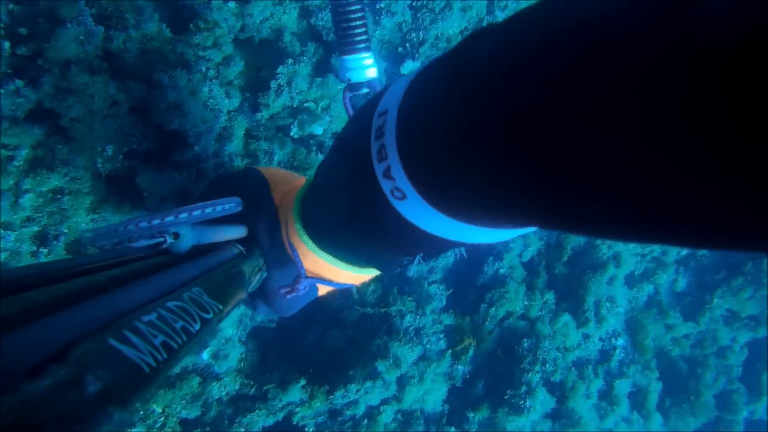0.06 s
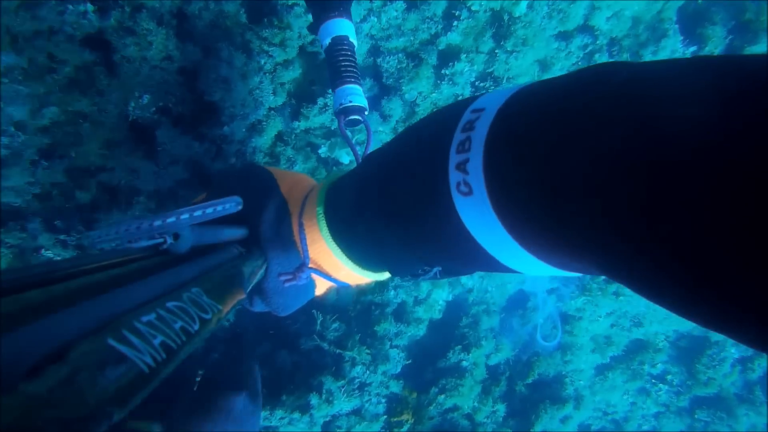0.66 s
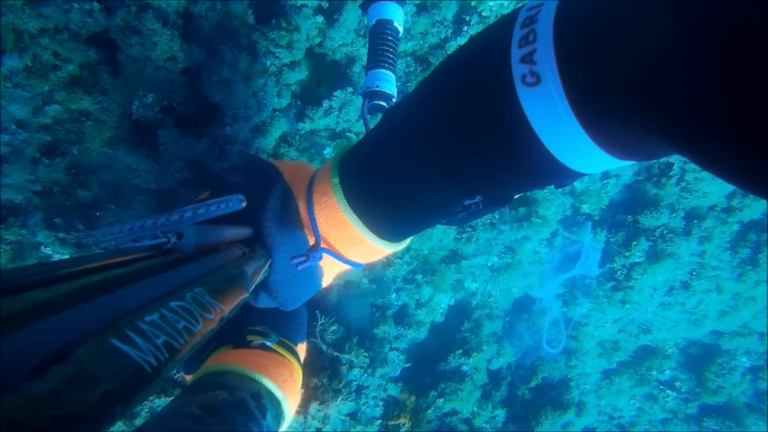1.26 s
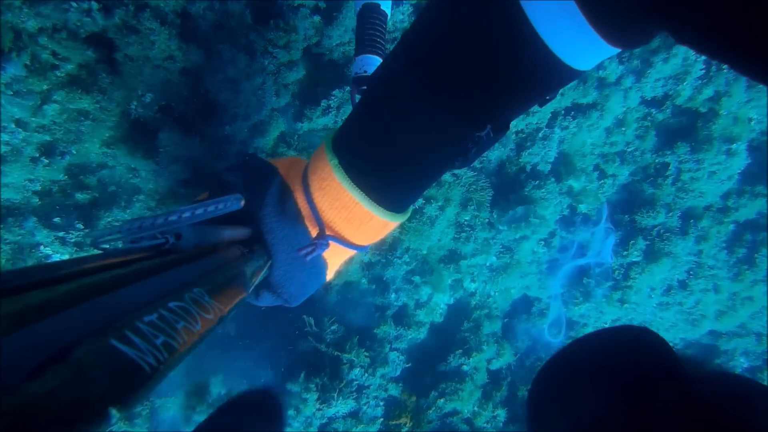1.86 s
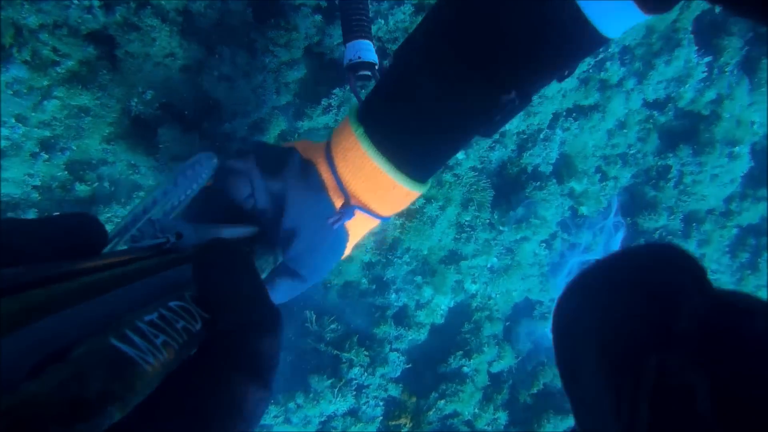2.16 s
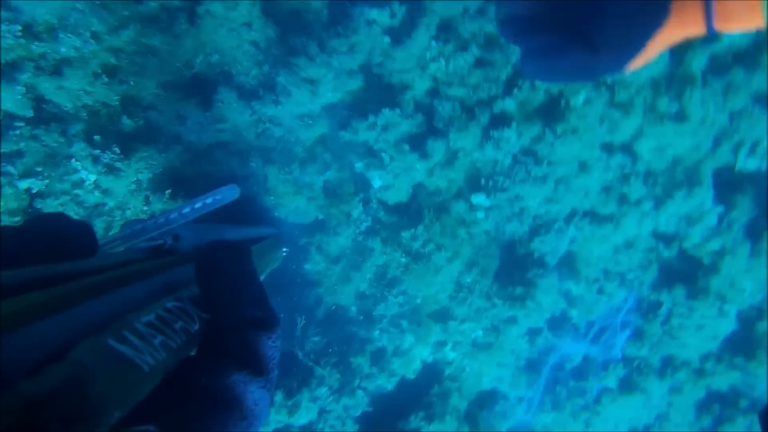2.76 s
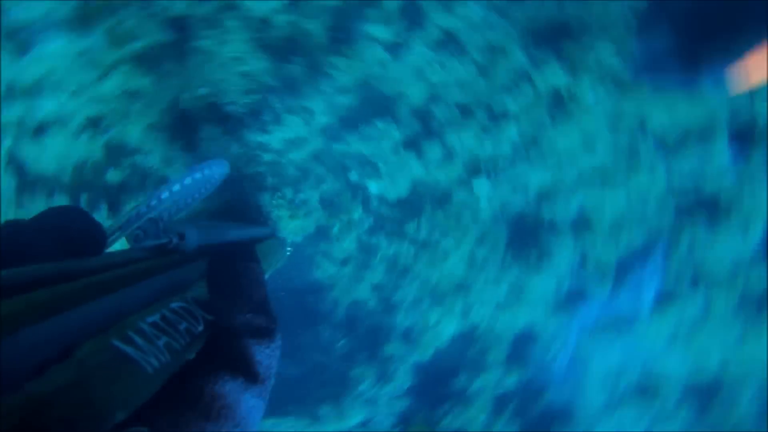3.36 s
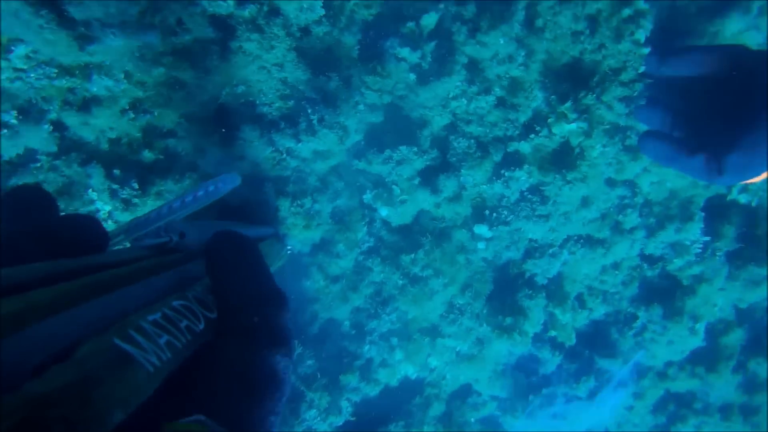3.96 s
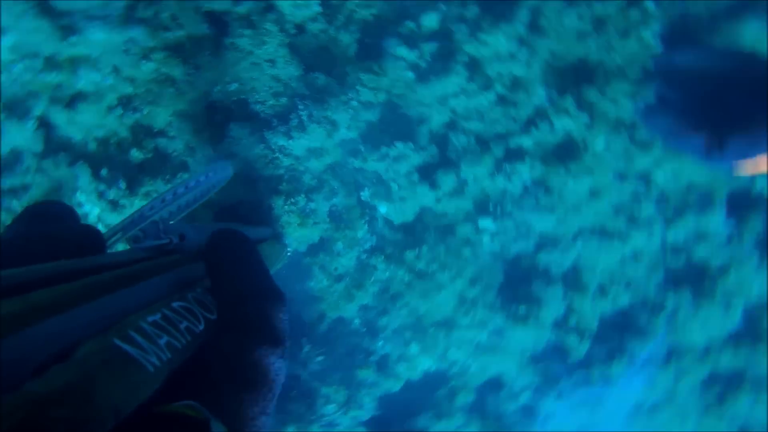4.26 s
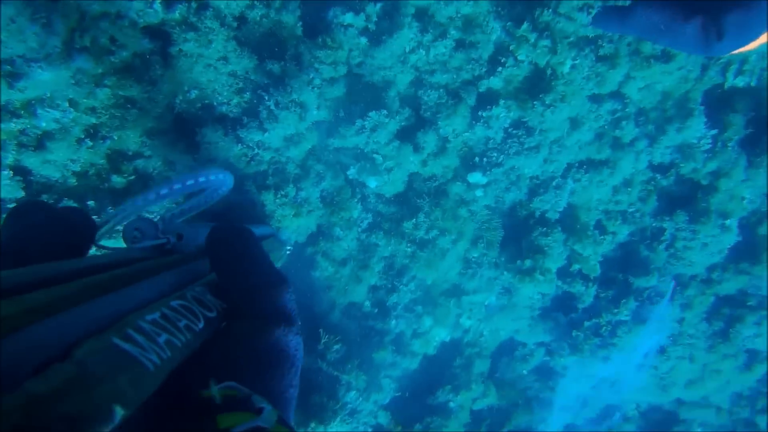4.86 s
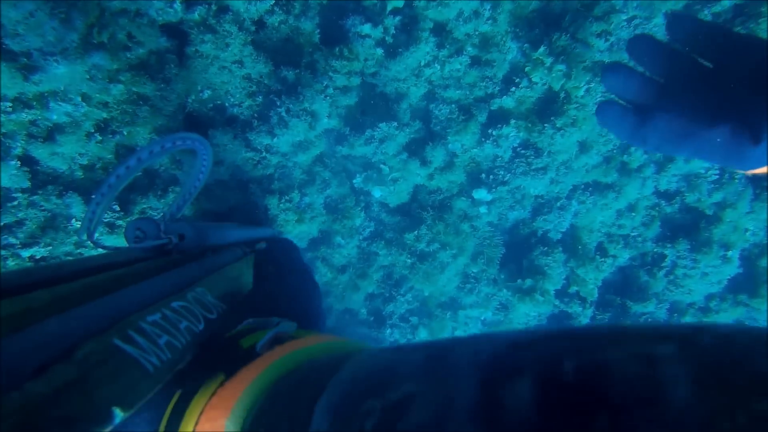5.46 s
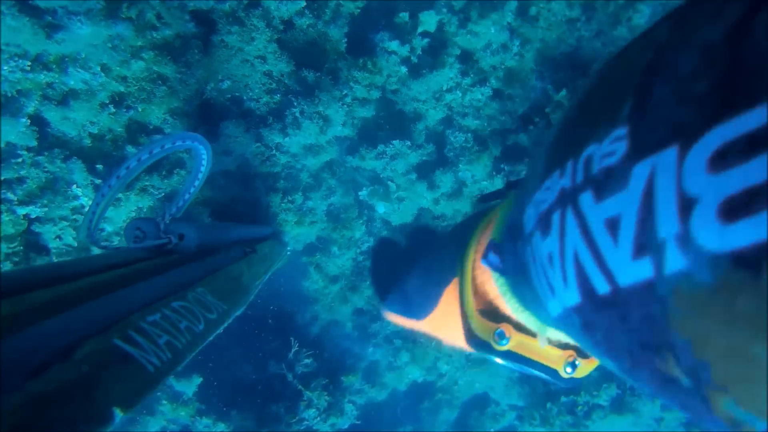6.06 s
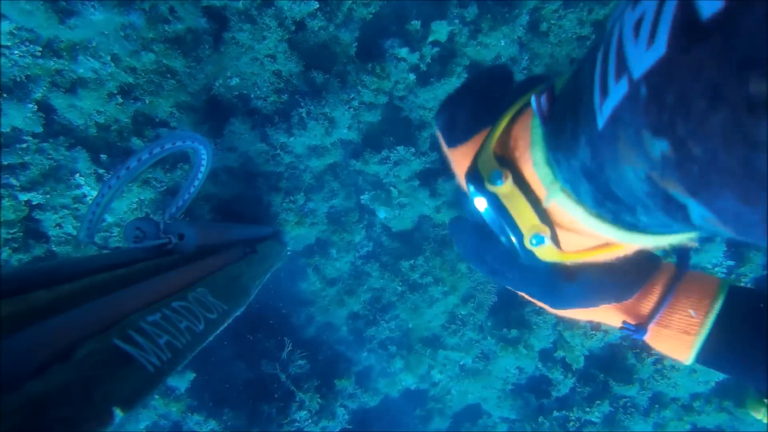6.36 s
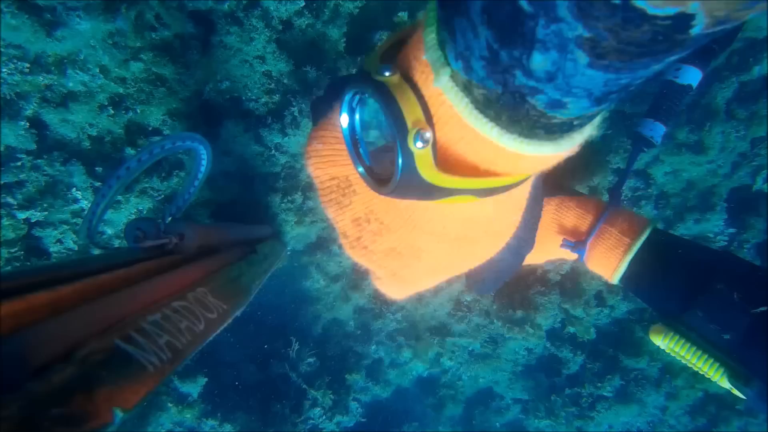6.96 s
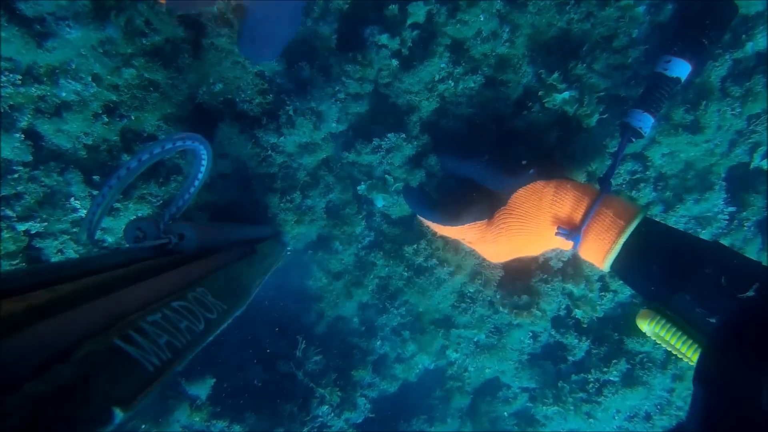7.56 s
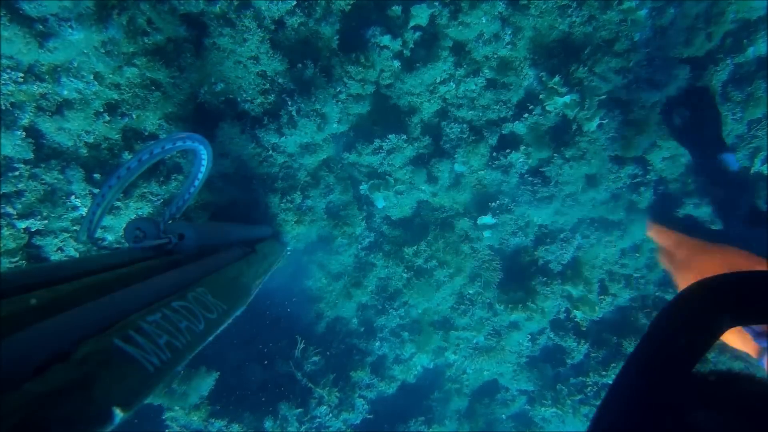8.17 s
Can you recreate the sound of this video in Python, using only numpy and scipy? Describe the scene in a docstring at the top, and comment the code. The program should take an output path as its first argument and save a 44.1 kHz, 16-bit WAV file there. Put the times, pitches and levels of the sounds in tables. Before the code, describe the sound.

A diver crawls over a rocky bottom with a speargun, heard from inside a sealed camera housing. A few hard knocks and a rubber groan give way to a long, growling judder. Then comes a busy stretch of gritty rubbing, scraping, pops and loud knocks, some overloading the microphone, with water rumbling low beneath. The gun comes to rest, leaving soft nudges and sharp little ticks of grit.

```python
"""Underwater on a rocky bottom, heard from inside a camera's sealed housing: a diver crawls with a speargun.
Rubber and neoprene stick and slip on the gun, once in a long judder, shaking the camera's mount and the
housing's wall and shell. Gear knocks on the gun and overloads the microphone. Water sways round the case,
and grit crackles in sharp ticks that go on when the gun comes to rest."""
import sys
import numpy as np
from scipy import signal
from scipy.fft import rfft, irfft
from scipy.io import wavfile
from scipy.ndimage import uniform_filter1d

SR = 44100
rng = np.random.default_rng(int(sys.argv[2]) if len(sys.argv) > 2 else 0)


def store_pcm(level_fs):
    """Save levels as 16-bit WAV."""
    pcm = np.round(np.clip(level_fs, -1, 1) * 32767).astype(np.int16)
    wavfile.write(sys.argv[1], SR, np.atleast_2d(pcm).T)


N = 362923


def from_db(db):
    """Turn decibels into a number to multiply by."""
    return 10 ** (np.asarray(db) / 20)


def rms_one(x):
    """Scale a sound so its average level (rms) is 1."""
    return x / np.sqrt(np.mean(x ** 2) + 1e-20)


def peak_one(x):
    """Scale a sound so its biggest value is 1."""
    return x / (np.abs(x).max() + 1e-20)


def evened(x, span_s):
    """Even out loudness changes slower than span_s; faster detail stays."""
    power = np.abs(uniform_filter1d(x ** 2, int(span_s * SR) + 1))
    return x / np.sqrt(power + 1e-4 * np.mean(x ** 2))


def add(out, s, sound):
    """Mix a sound in at s seconds."""
    i = max(int(s * SR), 0)
    out[i:i + len(sound)] += sound[:max(len(out) - i, 0)]


def keep(x, hz, side, order=2):
    """Keep the "low" or "high" side of hz and fade the other."""
    return signal.sosfilt(signal.butter(order, min(hz, .45 * SR), side, fs=SR, output="sos"), x)


def resonate(x, modes):
    """Ring at each (f/Hz, width/Hz, level/dB), flipping every second one; narrow ones ring longer."""
    out = 0
    for k, (hz, width, db) in enumerate(modes):
        r = np.exp(-np.pi * width / SR)
        poles = [1, -2 * r * np.cos(2 * np.pi * hz / SR), r * r]
        ring = (1 - r * r) / 2 * signal.lfilter([1, 0, -1], poles, x + 1e-18)
        out = out + (-1) ** k * from_db(db) * ring
    return out


def noise(colour):
    """Noise shaped by (f/Hz, level/dB) points, at average level 1."""
    hz, db = np.transpose(colour)
    f = np.maximum(np.arange(N // 2 + 1) * SR / N, 1)
    shape = from_db(np.interp(np.log(f), np.log(hz), db)) * np.minimum(f / hz[0], 1) ** 2
    return rms_one(irfft(rfft(rng.standard_normal(N)) * shape, N))


def envelope(start, length, attack_s, release_s, swell_db=0):
    """A loudness curve: fade in, hold while swelling or sinking, then die away."""
    out, t = np.zeros(N), np.arange(int((length + 10 * release_s) * SR)) / SR
    hold = from_db(swell_db * (np.minimum(t / length, 1) - .5))
    add(out, start, np.minimum(t / attack_s, 1) * hold * np.exp(-np.maximum(t - length, 0) / release_s))
    return out


def wobble(depth):
    """A quick, random waver around 1, to multiply a pitch by."""
    return 1 + depth * rms_one(keep(rng.standard_normal(N), 90, "low"))


def slips(per_s, uneven, spread_db):
    """A surface sticks, then lets go: one kick per slip, stronger after a longer hold."""
    draws = np.clip(rng.standard_normal((12000, 2)), -2, 2)
    hold = np.exp(uneven * draws[:, 0])
    at = (np.cumsum(hold) * SR / per_s).astype(int)
    out = np.zeros(N)
    out[at[at < N]] = (np.sqrt(hold) * from_db(spread_db * draws[:, 1]))[at < N]
    return out


def sliding(kicks, slide_s, creep):
    """Each slip speeds up and slows down over a rough surface, which creeps on between slips."""
    r = np.exp(-1 / (slide_s * SR))
    speed = rms_one(signal.lfilter([1], [1, -2 * r, r * r], kicks + 1e-18))
    return rms_one((speed + creep) * rng.standard_normal(N))


GRIP_S, MOUNT_RELEASE_S, WALL_RELEASE_S = 0.0072, 0.014, .01   # a stroke takes hold, then dies away


def stroke_gains(strokes):
    """The strongest stroke at each moment sets how hard mount and wall shake."""
    mount = wall = np.zeros(N)
    for s, length, db, swell, tension in strokes:
        mount = np.maximum(mount, from_db(db) * envelope(s, length, GRIP_S, MOUNT_RELEASE_S, swell))
        wall = np.maximum(wall, from_db(db + tension) * envelope(s, length, GRIP_S, WALL_RELEASE_S, swell))
    return mount, wall


# how the mount (low), wall (middle) and shell (high) ring: f/Hz, width/Hz, level/dB
MOUNT_RINGS = [(312.8, 26, 5.5), (532, 16, -6.5), (230, 130, -20.5), (85, 18, -2.5)]
WALL_RINGS = [(946, 180, -3.5), (1383, 75, 3), (1670, 780, -14.5)]
SHELL_RINGS = [(2450, 630, 6), (3250, 1390, 4), (4460, 740, 3.5), (6140, 670, -11), (12800, 3500, -35)]
# gear lightly touching between strokes: t/s, length/s, level/dB
LIGHT_TOUCHES = [(0, 0.47, -44), (1.968, 3.26, -42.5)]
# gritty strokes of rubber on the gun: t/s, length/s, mount level/dB, swell/dB, wall over mount/dB
RUB_STROKES = [(0.036, 0.079, -45, 14, 7), (0.184, 0.11, -38, -23, -0.5), (0.412, 0.041, -31, -0.5, 4.5),
               (1.624, 0.056, -38, 9.5, -4.5), (1.971, 0.35, -34.5, 12, 1), (2.356, 0.15, -29, 3.5, 5.5),
               (2.6, 0.027, -14, 7, -0.5), (2.673, 0.029, -27.5, -6.5, -21), (2.738, 0.021, -32.5, 8, 0),
               (3.045, 0.076, -31, -4, -11.5), (3.157, 0.029, -15.5, 4.5, -4.5), (3.237, 0.11, -29, 4, -8),
               (3.388, 0.11, -20, 7, -2), (3.633, 0.046, -24, 1.5, -4.5), (3.704, 0.096, -31, -8.5, -3.5),
               (4.3, 0.26, -31, -3.5, -4.5)]


def rubbing(snap_db=-8, shell_db=-17, crisp_db=-40):
    """Uneven, gritty slips shake mount and wall and hiss in the shell; the sharpest come straight through."""
    touch = sum(from_db(db) * envelope(s, length, GRIP_S, MOUNT_RELEASE_S)
                for s, length, db in LIGHT_TOUCHES)
    mount_gain, wall_gain = np.maximum(stroke_gains(RUB_STROKES), touch)
    kicks = slips(per_s=130, uneven=.9, spread_db=3.5)
    force = from_db(snap_db) * rms_one(kicks) + sliding(kicks, slide_s=0.0025, creep=0.3)
    mount = evened(keep(resonate(force, MOUNT_RINGS), 560, "low"), span_s=0.056)
    wall = keep(resonate(force, WALL_RINGS), 1730, "low", order=4)
    wall = evened(keep(wall, 480, "high"), span_s=0.18)
    hiss = shell_hiss(force, mount_gain, wall_gain)
    crisp = np.sqrt(wall_gain * mount_gain) * rms_one(keep(force * np.abs(force), 9000, "high"))
    return mount_gain * mount + wall_gain * wall + from_db(shell_db) * hiss + from_db(crisp_db) * crisp


def shell_hiss(force, mount_gain, wall_gain):
    """The roughness of a rubbed surface sets the shell's high notes hissing."""
    hiss = keep(resonate(force, SHELL_RINGS), 2800, "high")
    return np.sqrt(wall_gain * mount_gain) * evened(hiss, span_s=0.061)


def tick(size, low_hz=2600, high_hz=5000, width_hz=800, scatter=0.16, scatter_s=0.001):
    """A tiny snap, scattered by the rock on its way, briefly rings the case."""
    t = np.arange(SR // 120) / SR
    snap = (t == 0) + scatter * rng.standard_normal(len(t)) * np.exp(-t / scatter_s)
    hz, width = rng.uniform(low_hz, high_hz), width_hz * rng.uniform(0.28, 4.3)
    modes = [(1450, 600, -14), (hz, width, 0), (hz * rng.uniform(1.44, 1.85), 2 * width, -9)]
    # the hardest snaps also come straight through, with a bright edge
    return size * (peak_one(resonate(snap, modes)) + size * snap)


# single sharp ticks of grit on the rock: t/s, level/dB
GRIT_TICKS = [(1.668, -10.5), (1.827, -29), (2.872, -24), (3.31, -30), (4.993, -20), (5.072, -20),
              (5.936, -30), (6.04, -29.5), (6.647, -28), (7.777, -32), (7.839, -27.5), (7.881, -26),
              (7.958, -32.5)]
# spells of crackling as the diver shifts on the rock: t/s, length/s, typical tick level/dB
GRIT_SPELLS = [(0, 0.44, -47), (1.563, 0.34, -48), (1.993, 2.89, -38.5), (5.137, 0.49, -42),
               (5.857, 0.38, -46.5), (6.579, 0.48, -45.5), (7.559, 0.85, -51)]


def crackle(per_s=100, spread_db=6, fizz_db=-25, still_db=-60.5):
    """Grit snaps on the rock: a few loud ticks over spells of fine ones and a soft fizz."""
    out = np.zeros(N)
    size = from_db(still_db) + sum(from_db(db) * envelope(s, length, attack_s=0.0082, release_s=0.061)
                                   for s, length, db in GRIT_SPELLS)
    for s, db in GRIT_TICKS:
        add(out, s, tick(from_db(db)))
    for i in rng.integers(0, N, int(per_s * N / SR)):
        add(out, i / SR, tick(size[i] * from_db(spread_db * min(rng.standard_normal(), 1.5))))
    grains = sliding(slips(per_s=170, uneven=1.0, spread_db=-2.5), slide_s=0.0014, creep=.15)
    fizz = rms_one(resonate(grains, [(1790, 900, -8.0), (3956, 1500, -3.5), (6600, 2000, -4.0)]))
    fizz = rms_one(keep(fizz, 8000, "low"))
    return keep(out + from_db(fizz_db) * size * fizz, 840, "high")


# the rumble of moving water: f/Hz, relative level/dB
WATER_COLOUR = [(18, -1.5), (30, 12), (50, -14), (90, 5), (140, -15), (220, -19), (500, -71)]


def sway(handling, gain_db=-8, split_hz=55, deep_settle_s=0.077, boom_settle_s=0.0064, most_stir=0.57):
    """Rubs and knocks stir the water round the case; the boom settles sooner than the deep sway."""
    push = np.minimum(np.abs(handling), most_stir)   # drag limits the hardest shoves

    def stirred(settle_s):
        r = np.exp(-1 / (settle_s * SR))
        return signal.lfilter([1 - r], [1, -r], push)
    water = evened(noise(WATER_COLOUR), span_s=0.25)
    deep = stirred(deep_settle_s) * keep(water, split_hz, "low")
    boom = stirred(boom_settle_s) * keep(water, split_hz, "high")
    return from_db(gain_db) * (deep + boom)


# the steady background noise: f/Hz, relative level/dB
BACKGROUND_COLOUR = [(20, 4), (130, -5.5), (250, -16), (500, -13.5), (750, -19.5), (4200, -21.5),
                     (9000, -29)]


def background(level_db=-65):
    """A faint rumble and hiss lie under everything."""
    return from_db(level_db) * noise(BACKGROUND_COLOUR)


# the wall's nasal ring under a steady scrape: f/Hz, width/Hz, level/dB
NASAL_RINGS = [(1349, 81, 3.5), (1050, 607, -12), (870, 180, -9)]
# smooth scrapes of tight rubber: t/s, length/s, mount level/dB, swell/dB, wall over mount/dB
SCRAPE_STROKES = [(0.111, 0.055, -39, 10, 22.5), (0.622, 0.37, -57, 3, -6.5), (3.811, 0.13, -23, 3.5, -3),
                  (4.01, 0.13, -26, -10.5, -8), (4.724, 0.11, -25.5, 1, -0.5),
                  (4.83, 0.283, -27.5, -9, -2.5), (5.199, 0.19, -38.5, -6.5, -3),
                  (5.396, 0.13, -58, -9, 13.5)]


def scraping(shell_db=-17, span_s=0.053):
    """Fast, fine slips keep the mount and the wall's nasal note ringing."""
    mount_gain, wall_gain = stroke_gains(SCRAPE_STROKES)
    force = sliding(slips(per_s=260, uneven=.5, spread_db=1), slide_s=.002, creep=1.0)
    mount = evened(keep(resonate(force, MOUNT_RINGS), 720, "low", order=4), span_s)
    wall = evened(keep(resonate(force, NASAL_RINGS), 2100, "low", order=4), span_s)
    hiss = shell_hiss(force, mount_gain, wall_gain)
    return mount_gain * mount + wall_gain * wall + from_db(shell_db) * hiss


# short groans of rubber: t/s, length/s, f/Hz, level/dB
RUBBER_GROANS = [(0.184, 0.032, 255, -22), (0.282, .045, 269.7, -15.5), (3.821, .025, 310, -31),
                 (4.338, 0.021, 293.6, -19.5), (4.774, .04, 314.5, -16)]


def groans(sag_per_s=1.4, waver=.08, overtone_db=-14, attack_s=0.01, release_s=0.0047):
    """Slips fall into step with the mount, making a wavering tone that sinks as the rubber relaxes."""
    out, t = np.zeros(N), np.arange(N) / SR
    unsteady = wobble(waver)
    for s, length, hz, db in RUBBER_GROANS:
        pitch = hz * unsteady * (1 - sag_per_s * np.clip(t - s - length / 2, -length, length))
        phase = 2 * np.pi * np.cumsum(pitch) / SR
        tone = np.sin(phase) + from_db(overtone_db) * np.sin(2 * phase)
        out += from_db(db) * envelope(s, length, attack_s, release_s) * tone
    return out


# heavy knocks on gun and housing: t/s, ring f/Hz, ring level/dB, crack over ring/dB, thump over ring/dB
GEAR_KNOCKS = [(0.191, 1370, -21.5, -7, -13), (0.276, 1160, -9, -9.5, -21.5),
               (0.299, 1020, -6.5, -8.5, -19.5), (0.318, 948, 4.5, -19, -12),
               (0.358, 900, -12.5, -27.5, -1.5), (2.298, 1280, -20, -2.5, -26.5),
               (2.611, 1380, -7.5, -11, -8.5), (2.627, 1250, -4.5, -7.5, -15),
               (2.688, 1230, -18.5, -38, -0.5), (2.736, 1340, -18.5, -27, -10.5),
               (2.836, 1000, -20, -14.5, -3.5), (3.162, 1040, -5, -17, -8.5),
               (3.185, 1360, 2, -17.5, -17.5), (3.204, 1360, -9.5, -23, -6), (3.227, 1460, -11.5, -12, -6),
               (3.445, 1240, -14, -18, -9.5), (3.482, 1467, -4.5, -10.5, -3.5), (3.519, 1337, -1, -7, -6),
               (3.963, 1060, 5.5, -26, -23), (4.127, 1320, -13, -13, -29),
               (4.378, 1210, -7.5, -39.5, -24.5), (4.392, 1040, 0.5, -25, -12),
               (4.485, 1420, -12.5, -15, -7.5)]


def knocks(boom_db=-5.5, crunch=0.41, crunch_s=.003, width_hz=170, thump_hz=75, thump_s=0.008):
    """Each crunchy blow rings the wall, booms in the mount, cracks in the shell and thumps the case."""
    out, t = np.zeros(N), np.arange(SR // 8) / SR
    for s, hz, db, crack_db, thump_db in GEAR_KNOCKS:
        contact_s = crunch_s * from_db(db) ** 0.18   # heavier blows stay in contact longer
        pressure = (t / contact_s) ** 2 * np.exp(2 - 2 * t / contact_s)
        grains = rng.standard_normal(len(t)) * pressure
        force = signal.unit_impulse(len(t), int(contact_s * SR)) + crunch * grains
        ring = keep(resonate(force, [(hz, width_hz, 0), (1450, 300, -7)]), 1500, "low", order=4)
        crack = keep(keep(resonate(grains, SHELL_RINGS), 1500, "high"), 3900, "low")
        boom = keep(resonate(force, [(263.8, 35, 2.0), (550, 160, -6)]), 970, "low")
        thump = np.sin(2 * np.pi * thump_hz * rng.uniform(1.0, 1.6) * t) * t * np.exp(-2 * t / thump_s)
        blow = (peak_one(ring) + from_db(boom_db) * peak_one(boom)
                + from_db(crack_db) * peak_one(crack) + from_db(thump_db) * peak_one(thump))
        add(out, s, from_db(db) * blow)
    return out


# how mount, wall and shell ring under tight rubber: f/Hz, width/Hz, level/dB
TIGHT_MOUNT = [(100, 18.3, 1), (540, 280, -17.5), (288.6, 21, -3.5)]
TIGHT_WALL = [(957, 260, -20.5), (1376, 37, 3), (1660, 285, -10.5)]
TIGHT_SHELL = [(2675, 670, -0.5), (4230, 440, -0.5), (4790, 420, -2), (7340, 2600, -12), (11050, 520, -12)]


def judder(start_s=.825, length_s=.74, growl_db=-21.5, top_db=-24,
           hum_hz=90.23, stretch_hz=23, hum_db=-1, shell_db=-20, shell_swell_db=5):
    """Tight rubber lets go in slower, harder slips: a humming growl, a ringing top and a growing rasp."""
    progress = np.clip((np.arange(N) / SR - start_s) / length_s, 0, 1)
    pressure = np.abs(np.sin(np.pi * progress))   # rises and falls in one arch
    kicks = slips(per_s=59, uneven=.2, spread_db=1.5)
    rasp = sliding(kicks, slide_s=0.0043, creep=0.74)
    mount = keep(resonate(rms_one(kicks) + rasp / 2, TIGHT_MOUNT), 850, "low")
    mount = evened(keep(mount, 54, "high"), span_s=0.053)
    # the hum climbs as the rubber stretches, and drops as it lets go
    pitch = (hum_hz + stretch_hz * progress * pressure) * wobble(0.045)
    hum = np.sin(2 * np.pi * np.cumsum(pitch) / SR)
    wall = keep(resonate(rms_one(kicks) + rasp, TIGHT_WALL), 1440, "low", order=4)
    wall = evened(keep(wall, 630, "high"), span_s=0.063)
    shell = rms_one(resonate(resonate(rasp, TIGHT_SHELL), TIGHT_SHELL))
    shell_gain = from_db(shell_db + shell_swell_db * (progress - .5))
    # a higher power follows the pressure more steeply
    growl = pressure ** 1.07 * (mount + from_db(hum_db) * hum)
    top = pressure ** 0.57 * wall + pressure ** .35 * shell_gain * shell
    return from_db(growl_db) * growl + from_db(top_db) * top


# grit and gear catching under the glove: t/s, level/dB
GLOVE_POPS = [(2.223, -23.5), (2.271, -19), (2.371, -21), (2.448, -18), (2.48, -26), (2.545, -30),
              (2.649, -29), (2.811, -19.5), (2.901, -34), (3.004, -22.5), (3.65, -18.5), (3.676, -16),
              (4.095, -16), (4.176, -28), (4.211, -30), (4.308, -28), (4.573, -27), (4.626, -25)]


def pops(low_hz=850, high_hz=1600, width_hz=340, gap_s=0.0026, loss_db=3):
    """Each pop is three quick catches, each weaker than the last and ringing at its own pitch."""
    out, click = np.zeros(N), signal.unit_impulse(SR // 20)
    for s, db in GLOVE_POPS:
        for k, (hz, delay) in enumerate(rng.uniform([low_hz, 0], [high_hz, .5], (3, 2))):
            mode = [(hz, width_hz, 0)]
            ring = peak_one(resonate(resonate(click, mode), mode))
            add(out, s + gap_s * (k + delay), from_db(db - loss_db * k) * ring)
    return out


# light, hard clacks of loose parts: t/s, f/Hz, level/dB
LOOSE_CLACKS = [(2.979, 1120, -13.5), (3.725, 1304, 0), (4.476, 1080, -10.5), (4.551, 1170, -11),
                (4.71, 1070, -7.5), (4.975, 1140, -9.5)]


def clacks(contact_s=0.00062, width_hz=230, crack_db=-4):
    """A very short, hard hit cracks brightly in the shell and briefly rings the wall."""
    out, t = np.zeros(N), np.arange(SR // 20) / SR
    for s, hz, db in LOOSE_CLACKS:
        force = rng.standard_normal(len(t)) * t * np.exp(-t / contact_s)
        ring = resonate(signal.unit_impulse(len(t), int(contact_s * SR)), [(hz, width_hz, 0)])
        crack = keep(resonate(force, SHELL_RINGS), 2800, "low")
        clack = peak_one(ring) + from_db(crack_db) * peak_one(crack)
        add(out, s, from_db(db) * keep(clack, 4800, "low"))
    return out


# soft nudges of the resting gun: t/s, level/dB
GUN_NUDGES = [(5.879, -34.5), (6.063, -42.5), (6.124, -38), (6.901, -38.5), (6.973, -43.5)]


def nudges(wall_db=-6, drag=0.072, drag_s=0.021):
    """A padded touch drags a little and gives a dull knock in mount and wall."""
    out, t = np.zeros(N), np.arange(SR // 4) / SR
    fade = np.exp(-t / drag_s)
    for s, db in GUN_NUDGES:
        force = (t == 0) + drag * rng.standard_normal(len(t)) * fade
        mount = keep(resonate(force, MOUNT_RINGS), 1633, "low")
        wall = keep(resonate(force * fade, WALL_RINGS), 1600, "low", order=4)
        add(out, s, from_db(db) * (peak_one(mount) + from_db(wall_db) * peak_one(wall)))
    return out


def scene(thump_stir=5, thump_below_hz=130):
    """Everything reaches the one microphone through the housing."""
    rubs, blows = rubbing() + scraping(), knocks()
    water = sway(rubs + thump_stir * keep(blows, thump_below_hz, "low"))
    gear = rubs + groans() + blows + clacks() + pops() + judder() + nudges()
    return (gear + crackle() + water + background())[None]


def record(dry, overload=0.45, top_hz=15500):
    """The hardest knocks overload the microphone and are flattened; the highest treble is cut."""
    flattened = dry / (1 + (dry / overload) ** 8) ** (1 / 8)
    return signal.sosfilt(signal.ellip(10, .1, 80, top_hz, fs=SR, output="sos"), flattened)


dry = scene()
out = record(dry)
store_pcm(out)
```